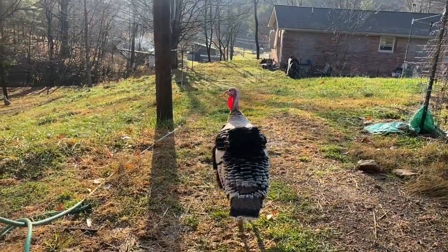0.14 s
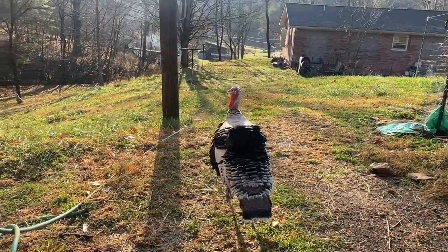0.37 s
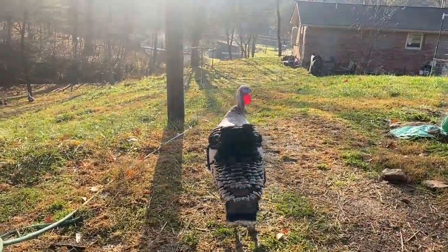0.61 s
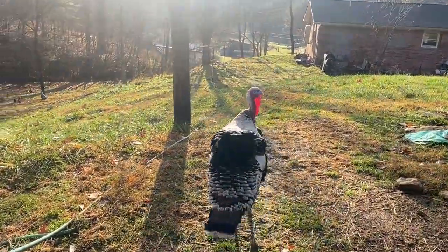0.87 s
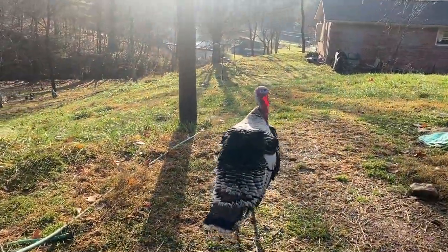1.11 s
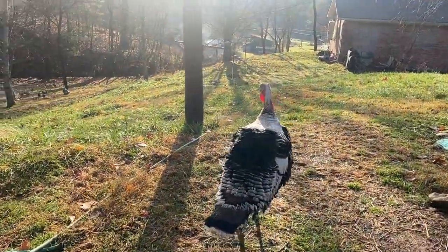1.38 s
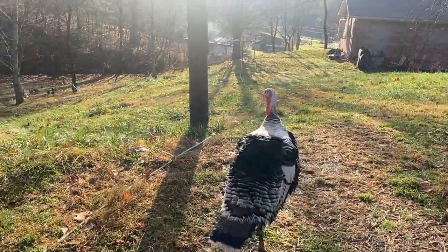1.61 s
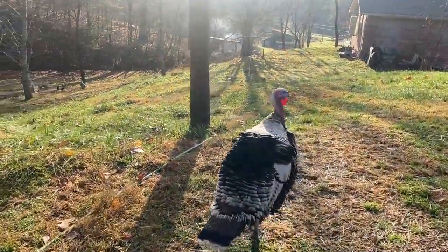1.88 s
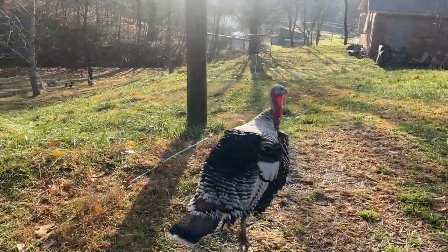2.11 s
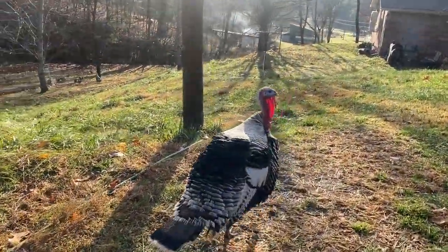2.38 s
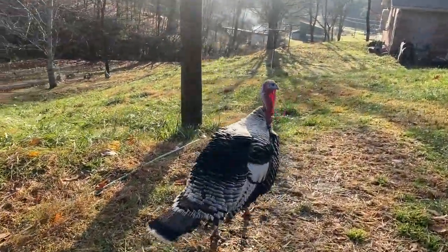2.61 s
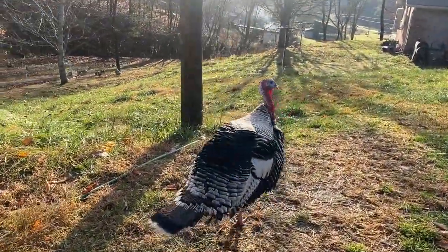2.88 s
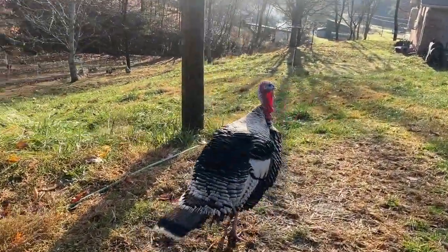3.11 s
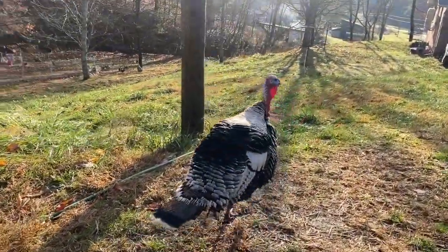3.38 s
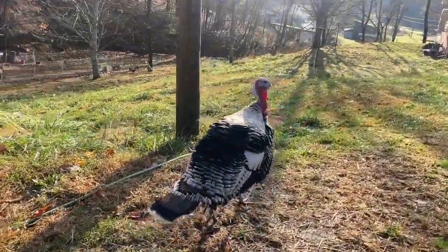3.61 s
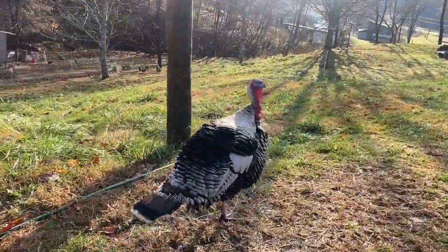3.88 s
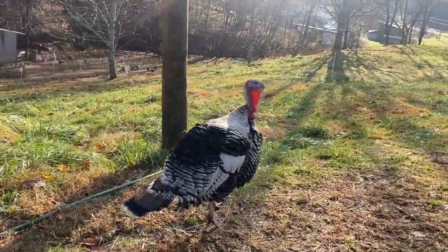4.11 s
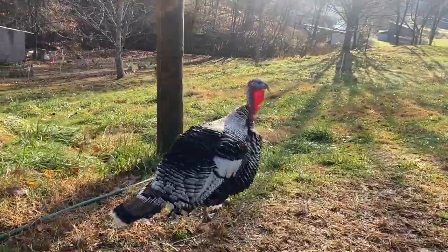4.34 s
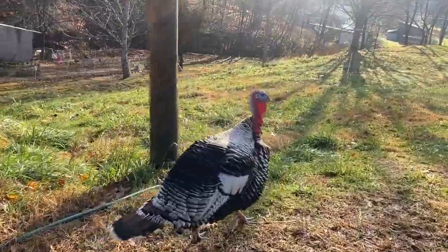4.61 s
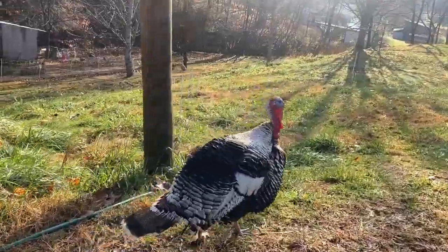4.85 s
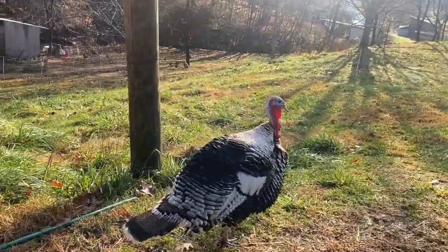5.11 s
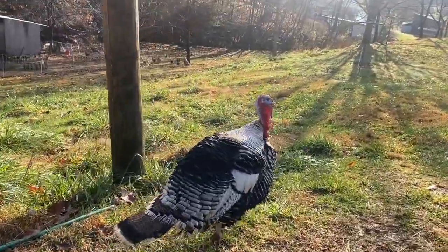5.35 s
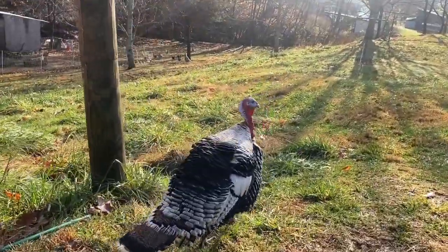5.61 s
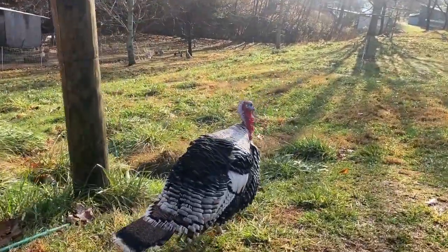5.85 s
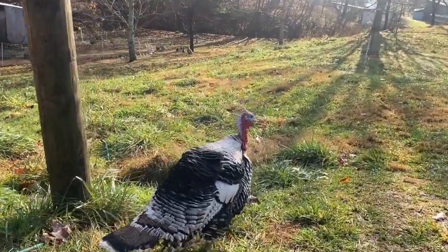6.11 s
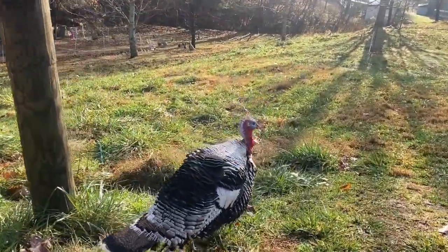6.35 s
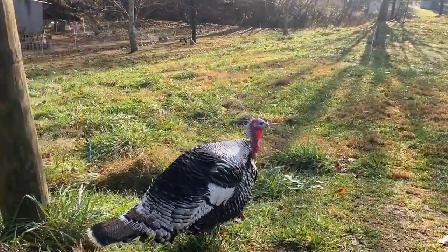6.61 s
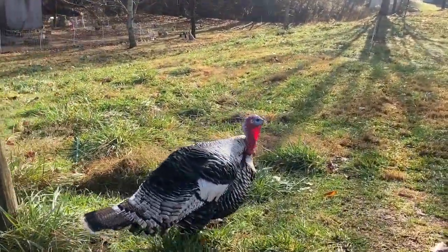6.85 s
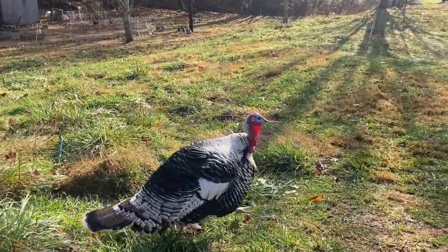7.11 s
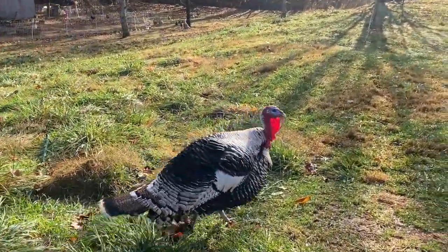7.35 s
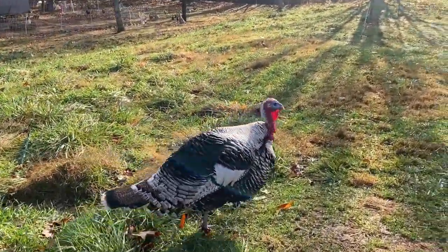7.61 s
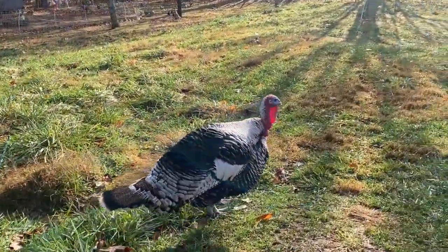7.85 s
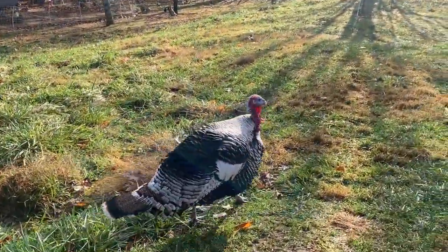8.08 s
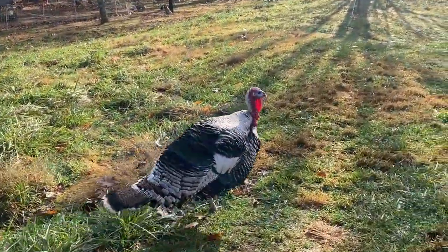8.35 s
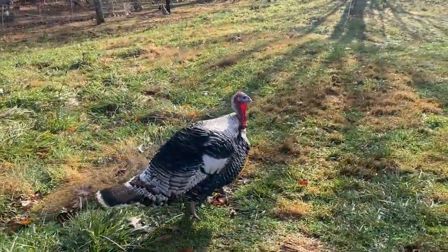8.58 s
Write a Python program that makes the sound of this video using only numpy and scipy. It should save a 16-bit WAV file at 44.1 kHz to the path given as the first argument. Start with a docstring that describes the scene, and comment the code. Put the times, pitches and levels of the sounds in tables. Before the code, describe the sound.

A tom turkey a few metres away gobbles in repeated rattling bursts, with soft chest thuds, faint outdoor echo and feet swishing through dry grass.

```python
"""A tom turkey a few metres away gobbles in bursts on a grassy yard: clear gliding notes, built from
harmonics, end in a noisy pop; a low chest boom, a struck and shaken resonance, lies under them.
Ground and nearby walls scatter the call and far slopes return a long faint echo, both as fading noise.
Feet swish through dry grass (hiss and crackle), twigs tick (tiny noise bursts), an insect trills
faintly (a wavering whistle), and a soft, mostly low background noise stays underneath."""
import sys
import numpy as np
from scipy import signal
from scipy.fft import rfft, irfft
from scipy.io import wavfile
from scipy.ndimage import uniform_filter1d

SR = 44100
rng = np.random.default_rng(int(sys.argv[2]) if len(sys.argv) > 2 else 0)


def transcribe(signal):
    """Save signal, clipped to [-1, 1], as a 16-bit WAV file at the path in sys.argv[1]."""
    frames = np.atleast_2d(signal).T
    limited = np.clip(frames, -1, 1)
    pcm = np.round(limited * 32767).astype(np.int16)
    wavfile.write(sys.argv[1], SR, pcm)


def to_linear_factor(level_db):
    """Convert decibel levels (scalar or array-like) to linear amplitude factors."""
    exponent = np.asarray(level_db, float) / 20
    return 10 ** exponent


N = 384552

# colour of dry grass and twigs: [f/Hz, relative level per Hz/dB]
GRASS_COLOUR = [(88, -31.5), (150, -7.5), (1160, -5.5), (1650, -8), (6450, -9.5), (9340, -11.5),
                (11800, -4), (13500, -36), (14600, -6.5), (15800, -25)]
# long opening notes of the gobbles; most break between two registers, some stay high;
# one curve a note: [t/s, pitch f/Hz, level/dB]
OPENING_NOTES = [
    [(0.559, 1081, -44.5), (0.571, 1100, -30), (0.583, 977, -30), (0.613, 799, -38), (0.621, 970, -43),
     (0.643, 929, -30), (0.655, 1040, -28.5), (0.663, 1170, -34), (0.665, 1210, -34.5), (0.675, 998, -32),
     (0.683, 1045, -33.5)],
    [(1.272, 1030, -45.5), (1.28, 1069, -30.5), (1.288, 1032, -26.5), (1.296, 951, -26), (1.306, 692, -34),
     (1.31, 631, -30), (1.316, 657, -32), (1.324, 758, -29.5), (1.332, 754, -44), (1.34, 900, -39.5),
     (1.356, 911, -29), (1.364, 1063, -36.5), (1.368, 1110, -28.5)],
    [(2.369, 983, -36.5), (2.377, 984, -35), (2.389, 1001, -22.5), (2.399, 917, -29), (2.409, 684, -36.5),
     (2.425, 668, -29), (2.431, 726, -31), (2.467, 781, -32), (2.485, 724, -32), (2.497, 846, -37.5),
     (2.509, 810, -27), (2.517, 952, -30), (2.52, 921, -32)],
    [(3.151, 1084, -35.5), (3.163, 1067, -26), (3.177, 933, -24), (3.187, 729, -44.5), (3.193, 690, -25.5),
     (3.201, 777, -29), (3.211, 785, -39.5), (3.217, 880, -38), (3.227, 990, -32), (3.233, 976, -21),
     (3.247, 927, -32), (3.255, 1064, -23), (3.26, 1027, -38.5)],
    [(3.954, 1090, -42.5), (3.962, 1097, -32.5), (3.974, 938, -30.5), (3.984, 941, -34.5),
     (3.992, 876, -32.5), (4.014, 948, -53.5), (4.026, 946, -29), (4.05, 959, -30.5), (4.074, 864, -33),
     (4.106, 945, -32.5), (4.114, 940, -27), (4.125, 940, -30)],
    [(4.754, 1110, -45), (4.764, 1091, -30.5), (4.774, 1008, -22.5), (4.778, 950, -27), (4.786, 750, -39),
     (4.79, 660, -28), (4.8, 675, -29), (4.822, 772, -30), (4.83, 954, -39.5), (4.836, 1008, -24.5),
     (4.864, 1002, -28), (4.876, 920, -32), (4.888, 1002, -40)],
    [(5.959, 1070, -43), (5.971, 1060, -28.5), (5.977, 976, -29), (5.993, 618, -33.5), (6.001, 611, -57),
     (6.011, 648.5, -27), (6.037, 737, -29.5), (6.049, 636, -30), (6.077, 673, -28), (6.083, 710, -31.5),
     (6.095, 1023, -31.5), (6.113, 920, -33.5), (6.118, 1000, -34)],
    [(6.766, 1064, -45), (6.776, 1110, -40), (6.782, 1040, -25.5), (6.788, 961, -27), (6.8, 618, -27.5),
     (6.808, 640, -26), (6.818, 744, -26.5), (6.828, 798, -43), (6.834, 932, -26.5), (6.842, 1048, -28),
     (6.854, 1025, -20), (6.862, 910, -27.5), (6.87, 1020, -35.5)],
    [(7.472, 1048, -43), (7.488, 1075, -27.5), (7.502, 928.5, -20.5), (7.512, 679, -27.5),
     (7.516, 654, -28), (7.526, 693, -27.5), (7.532, 773, -26.5), (7.54, 926, -32.5), (7.544, 987, -27),
     (7.562, 878, -22.5), (7.578, 1200, -50.5), (7.592, 970, -26), (7.597, 1060, -32.5)],
    [(8.251, 1150, -52), (8.261, 1300, -29), (8.267, 1282, -34), (8.275, 1013, -29), (8.283, 961, -32),
     (8.293, 967, -35.5), (8.339, 998, -29.5), (8.349, 997, -34), (8.355, 1190, -38.5), (8.379, 1188, -36)],
]
# the shorter notes that follow: most sag, then break upward; a few rise first or break downward:
# [break t/s, length before/s, length after/s, f before/Hz, f after/Hz, level before/dB, level after/dB]
SWOOP_NOTES = [ (.009, 0.011, .03, 510, 987, -33, -23.5), (.099, 0.015, 0.01, 710, 1150, -38, -28),
               (0.155, .017, .009, 738, 997, -40, -27), (.75, .028, 0.024, 625, 863, -31, -28),
               (0.831, .02, .007, 737, 1014, -29.5, -28), (0.882, 0.018, 0.007, 818, 1070, -34.5, -27),
               (1.435, .025, 0.032, 702.6, 965, -30.5, -27.5), (1.516, .016, 0.0091, 727, 944, -33, -24),
               (1.571, .014, .01, 889, 1032, -31, -27.5), (2.598, .033, 0.015, 531, 692, -24, -24.5),
               (2.665, .018, 0.0077, 721, 993, -28.5, -20), (2.724, .015, 0.0066, 754, 1200, -28, -29.5),
               (3.328, 0.029, 0.019, 557.4, 826, -28, -22), (3.406, 0.014, 0.012, 742, 1035, -25, -22.5),
               (3.464, 0.01, .01, 771, 1054, -24.5, -22), (4.187, 0.021, 0.0088, 655, 943, -26, -20),
               (4.26, 0.025, 0.012, 687, 1023, -27, -21), (4.316, .011, 0.0055, 870, 940, -35.5, -23.5),
               (4.951, 0.018, 0.026, 716, 807, -26.5, -22), (5.036, 0.021, 0.0068, 684.5, 1030, -24, -22),
               (5.093, 0.015, 0.0084, 740, 1150, -28, -25), (6.188, 0.024, 0.019, 636, 773, -24.5, -22),
               (6.27, .024, 0.0034, 751, 1030, -21.5, -25.5), (6.326, 0.019, 0.0054, 755, 1194, -38, -31.5),
               (6.382, 0.011, 0.005, 1025, 1396, -36.5, -39), (6.951, .041, .006, 731.4, 838, -21, -30.5),
               (7.008, 0.017, 0.0087, 740, 917, -24.5, -18.5), (7.066, .014, .01, 776, 1002, -21, -24),
               (7.12, .007, 0.011, 1007, 1002, -36, -36), (7.674, 0.034, 0.0093, 867.4, 736, -19, -26),
               (7.742, 0.016, 0.0077, 693, 1060, -22.5, -20), (7.8, .017, 0.0069, 753, 1260, -23, -18.5),
               (8.441, 0.026, 0.02, 826.6, 1139, -18.5, -26), (8.523, 0.015, 0.0065, 830, 1240, -21.5, -29),
               (8.583, .014, 0.0068, 841, 1327, -28, -27), ]


def rms_one(x):
    """Scale a sound to an average strength (rms) of 1."""
    return x / np.sqrt(np.mean(x ** 2) + 1e-20)


def in_time(rows):
    """Join the points of a time table by straight lines, one curve for each column after the time."""
    s, *columns = np.transpose(rows)
    return [np.interp(np.arange(N) / SR, s, c) for c in columns]


def at_hz(points, hz):
    """Read a frequency table at any frequency, along a logarithmic frequency scale."""
    table_hz, values = np.array(points)[:, :2].T
    return np.interp(np.log(np.maximum(hz, 1)), np.log(table_hz), values)


def drift(rate_hz):
    """Slow chance: noise twice through a one-pole low-pass; spread 1."""
    r = np.exp(-2 * np.pi * rate_hz / SR)
    slow = signal.lfilter([1], [1, -2 * r, r * r], rng.standard_normal(N + SR))
    return rms_one(slow[SR:])  # leave out the filter's start


def coloured(x, spectrum):
    """Make each frequency louder or softer by a spectrum in dB."""
    return irfft(rfft(x) * to_linear_factor(at_hz(spectrum, np.fft.rfftfreq(N, 1 / SR))), N)


def stereo_noise(alike):
    """Two channels sharing part of their noise; alike runs from 0 (nothing) to 1 (all)."""
    mid, side = rng.standard_normal((2, N))
    return np.sqrt(1 + alike) * mid + np.sqrt(1 - alike) * side * [[1], [-1]]


def strikes(rows):
    """One single-sample impulse for each (time in s, strength in dB)."""
    out = np.zeros(N)
    for s, db in rows:
        out[min(round(s * SR), N - 1)] = to_linear_factor(db)
    return out


def at_ports(x):
    """Direct sound reaches the microphone's two ports with a different phase and level."""
    # phase between the ports: [f/Hz, lead of left/radians]
    lead = [(100, .3), (500, .7), (2500, .75), (4500, 1.1), (8500, 1.3), (12000, 2.0), (16000, 1.2)]
    # level between the ports: [f/Hz, left over right/dB]
    tilt = [(60, -1), (240, -3), (950, 1), (3770, -2), (15000, 0.5)]
    # the microphone turns: [t/s, left over right/dB]
    turn = [(0, 1), (.7, 1.2), (1.4, 1.3), (2.5, -0.5), (4.9, 0), (6.1, 0.5), (8.4, -0.5)]
    hz = np.fft.rfftfreq(N, 1 / SR)
    # each port takes half of the difference, in opposite directions
    half = to_linear_factor(at_hz(tilt, hz) / 2) * np.exp(.5j * at_hz(lead, hz))
    turn_db, = in_time(turn)
    turn_gain = to_linear_factor(turn_db / 2)
    left = irfft(rfft(x) * half, N) * turn_gain
    right = irfft(rfft(x) / half, N) / turn_gain
    return np.array([left, right])


def background_air(level_db=-67, drift_db=1.7):
    """Partly shared stereo noise, strongest in the bass, whose level drifts slowly."""
    # colour of the background: [f/Hz, relative level per Hz/dB]
    air_colour = [(18, -26), (30, -7.5), (81, -13), (127, -17.5), (244, -22.5), (447, -23.5), (860, -23),
                  (1010, -29.5), (1570, -33.5), (6000, -44), (15800, -53)]
    noise = rms_one(coloured(stereo_noise(0.25), air_colour))
    return to_linear_factor(level_db + drift_db * drift(1)) * noise


def grass(grains_per_s=500, spread_db=5.0, grain_db=-4, level_db=3.5, loose_db=-8):
    """Blades brush as hiss while dry stalks crackle; each step swells and fades."""
    # steps through grass: [t/s, level before the common gain/dB, half length/s]
    steps = [(0.013, -69, 0.038), (0.489, -70, 0.036), (1.279, -77, 0.045), (1.993, -65.5, 0.037),
             (2.605, -64.5, 0.0085), (2.693, -69.5, 0.055), (3.326, -73.5, 0.075), (3.601, -63, 0.023),
             (4.261, -62.5, 0.0078), (4.426, -70.5, 0.047), (4.885, -70, 0.036), (5.196, -69, 0.033),
             (5.803, -69.5, 0.043), (6.01, -70.5, 0.055), (6.287, -62, 0.074), (6.493, -65.5, 0.032),
             (6.741, -64, 0.042), (6.922, -62, 0.064), (7.331, -55.5, 0.038), (7.67, -67.5, 0.067),
             (7.81, -70.5, 0.032), (8.185, -61, 0.045), (8.464, -63, 0.038)]
    # 16 faint stirrings at random moments, in the same three columns
    stirs = [(when * N / SR, -77 + 2.0 * (4 * size - 2), .022 * (.5 + long))
             for when, size, long in rng.random((16, 3))]
    t = np.arange(0, N, 32) / SR
    power = 0
    for s, db, half_s in steps + stirs:
        distance = np.minimum(abs(t - s) / max(half_s, .005), 30)
        power = power + to_linear_factor(2 * db) / np.cosh(distance) ** 2
    level = np.interp(np.arange(N) / SR, t, np.sqrt(power)) * to_linear_factor(level_db + 3.4 * drift(25))
    sizes = to_linear_factor(spread_db * np.minimum(rng.exponential(1, N), 5))
    hits = sizes * (rng.random(N) < grains_per_s / SR)
    grains = rms_one(signal.lfilter([1], [1, -.9], hits))
    near = at_ports(rng.standard_normal(N) * (1 + to_linear_factor(grain_db) * grains))
    loose = to_linear_factor(loose_db) * stereo_noise(0)
    return level * rms_one(coloured(near + loose, GRASS_COLOUR))


def opening(note, leap_ratio=1.17, leap_s=.005):
    """Any break of register (a wide pitch step) holds one pitch and leaps quickly where the note is weakest."""
    out = [note[0]]
    for (s0, hz0, db0), (s1, hz1, db1) in zip(note, note[1:]):
        if max(hz0 / hz1, hz1 / hz0) > leap_ratio and s1 - s0 > leap_s:
            s, hz = (s1 - leap_s, hz0) if db1 < db0 else (s0 + leap_s, hz1)
            out.append((s, hz, np.interp(s, [s0, s1], [db0, db1])))
        out.append((s1, hz1, db1))
    return out


def swoop(at, before_s, after_s, old_hz, new_hz, old_db, new_db):
    """Pitch and level of a shorter note: it glides to one pitch, breaks to another and is shut off."""
    break_s, shut_s = .004, .004  # time of the break; time in which the beak shuts
    start, arrive = at - before_s, at + break_s
    end = at + max(after_s, break_s + shut_s)
    first_hz = min(1.25 * old_hz, 987)
    points = [(start, first_hz, -40),
              (start + min(.006, before_s / 2), np.sqrt(first_hz * old_hz), old_db - 4),
              (start + .7 * before_s, old_hz, old_db),
              (at, old_hz, old_db - 1.5),  # a little softer just before the break
              (arrive, new_hz, new_db)]
    if end - 2 * shut_s > arrive:
        # a held pitch fades a little, then ends in a brief louder, higher flick
        points += [(end - 2 * shut_s, new_hz, new_db - 4), (end - shut_s, new_hz * 1.1, new_db - 3)]
    return points + [(end, new_hz * 1.146, new_db - 10)]


def voice(jitter=0.015, rolloff_db=-7.5, open_hz=900, open_db=4.5, effort=0.16, fickle_db=3.5,
          rasp_db=-28, short_db=4.5, short_jitter=0.028, pop_db=-16, pop_s=0.0089, glide_db=0.1,
          rasp_gain_db=17.5, shimmer_db=.7, rattle_db=1.0):
    """The syrinx sings a near sine with fickle harmonics through the throat; the beak shuts notes with a pop."""
    # throat and beak colour on the harmonics: [f/Hz, relative level/dB]
    throat = [(450, -23.5), (700, 6), (1000, 0), (1400, 10), (1540, 0), (1680, -8.5), (1800, -8.5),
              (2050, -9), (2550, -17.5), (3050, -15.5), (3800, -10.5), (4400, -27), (5200, -31)]
    out, pops = np.zeros(N), np.zeros(N)
    wobble, flutter = drift(100), drift(110)
    breath = rms_one(coloured(rng.standard_normal(N), throat))
    fickle = np.array([drift(35) for _ in range(8)])
    k = np.arange(1, 9)[:, None]  # harmonic numbers
    upper = k > 2
    octaves = np.log2(k)  # height of each harmonic above the pitch
    for note in [opening(rows) for rows in OPENING_NOTES] + [swoop(*row) for row in SWOOP_NOTES]:
        # a note creeps in faintly; the closing beak flicks the pitch up as it dies
        first, last = note[0], note[-1]
        before = (first[0] - .003, first[1], first[2] - 8)
        after = (last[0] + .006, last[1] * 1.3, last[2] - 10)
        s, hz, db = np.transpose([before, *note, after])
        short = s[-1] - s[0] < .08  # short notes are duller, rattle and grow raspy
        i = np.arange(max(round(s[0] * SR), 0), min(round(s[-1] * SR), N))
        t = i / SR
        glide_hz = np.interp(t, s, hz)
        pitch = uniform_filter1d(glide_hz, size=80) * (1 + (jitter + short * short_jitter) * wobble[i])
        # pressure builds evenly, so height rather than dB is joined between points
        height = uniform_filter1d(np.interp(t, s, to_linear_factor(db)), size=50)
        # high pitch opens the beak and effort sharpens the cycle: both lift the upper harmonics
        opened = open_db * np.log2(pitch / open_hz) * upper
        slope = rolloff_db + opened + effort * (20 * np.log10(height) + 28)  # dB an octave
        chance_db = np.sqrt(octaves) * fickle_db * fickle[:, i]
        shares = to_linear_factor(at_hz(throat, k * pitch) + octaves * slope - short_db * short * upper + chance_db)
        # a fast glide dulls the overtones (glide_db is dB for each octave a second)
        gliding = uniform_filter1d(np.abs(np.gradient(np.log2(glide_hz))) * SR, size=200)
        shares *= to_linear_factor(-np.minimum(glide_db * gliding, 15) * upper)
        shares /= np.sqrt(np.sum(shares ** 2, axis=0) / 2)  # same strength whatever the colour
        tone = np.sum(shares * np.sin(k * np.cumsum(2 * np.pi * pitch / SR)), axis=0)
        progress = (t - s[0]) / (s[-1] - s[0])
        rasp = to_linear_factor(rasp_db + rasp_gain_db * short * progress) * breath[i]
        fade = np.clip(np.minimum((t - s[0]) / .005, (s[-1] - t) / .006), 0, 1)
        edges = np.sin(np.pi / 2 * fade)
        unsteady = to_linear_factor((shimmer_db + rattle_db * short) * flutter[i])
        out[i] = edges * height * unsteady * (tone + rasp)
        pops[i[-1] - round(.01 * SR)] = to_linear_factor(db[-3])
    puff = signal.lfilter([1], [1, -np.exp(-1 / (pop_s * SR))], uniform_filter1d(pops, size=44) + 1e-18)
    soften = signal.butter(4, 5200, fs=SR, output="sos")
    return signal.sosfilt(soften, out + to_linear_factor(pop_db) * puff * breath)


def jolts(lag_s=.022, after_db=-51.5):
    """Every note jolts the air sac a moment after it starts, more weakly under the shorter notes."""
    # jolt under each opening note: [strength before the boom's filter and gain/dB]
    jolt_strengths = [-38.5, -34.5, -41, -39, -38.5, -34.5, -34.5, -29, -31, -33]
    first = [(note[0][0] + lag_s, db) for note, db in zip(OPENING_NOTES, jolt_strengths)]
    return first + [(at - before_s + lag_s, after_db) for at, before_s, *_ in SWOOP_NOTES]


def boom(call, boom_hz=84.5, t60_s=0.1, soft_hz=130, level_db=-1.0, shake_db=-26, shake_s=0.027):
    """The inflated chest thuds softly as air is driven out and keeps shaking while the bird calls."""
    # a resonance that dies by 60 dB in t60_s
    r, w = to_linear_factor(-60 / (t60_s * SR)), 2 * np.pi * boom_hz / SR
    top, bottom = [0, np.sin(w)], [1, -2 * r * np.cos(w), r * r]
    thuds = signal.lfilter(top, bottom, strikes(jolts()) + 1e-18)
    rumble = rms_one(signal.lfilter(top, bottom, rng.standard_normal(N)))
    slow = np.exp(-1 / (shake_s * SR))
    loudness = signal.lfilter([1 - slow], [1, -slow], np.abs(call))
    chest = thuds + to_linear_factor(shake_db) * rumble * loudness
    return to_linear_factor(level_db) * signal.sosfilt(signal.butter(2, soft_hz, fs=SR, output="sos"), chest)


def yard(x, near_db=-14, near_t60_s=0.048, near_gap_s=0.0047, far_db=-31, far_t60_s=1.9, far_gap_s=0.023,
         echo_s=0.023, echo_db=-26.5):
    """Dense scatter from ground and walls dies fast around one clear echo; a faint far echo lingers."""
    # colour of the returning sound: [f/Hz, gain/dB]
    scatter_colour = [(300, -13), (800, -0.5), (1400, -0.5), (2200, 8.5), (2700, 0), (5000, -10.5)]
    t = np.arange(2 * SR) / SR
    response = 0
    near = (near_db, near_t60_s, near_gap_s, .6)
    far = (far_db, far_t60_s, far_gap_s, .3)
    for db, t60_s, gap_s, alike in (near, far):
        tail = stereo_noise(alike)[:, :2 * SR] * to_linear_factor(-60 * t / t60_s) * (t > gap_s)
        response = response + to_linear_factor(db) * tail / np.sqrt(np.mean(np.sum(tail ** 2, axis=1)))
    response[:, round(echo_s * SR)] += to_linear_factor(echo_db)  # something a few metres off
    return signal.fftconvolve(coloured(x, scatter_colour)[None], response, axes=1)[:, :N]


def insect(waver=0.01, throb_db=6.0):
    """A thin whistle whose pitch wavers and whose level throbs by chance."""
    # the trill before waver and throb: [t/s, f/Hz, level/dB]
    trill = [(1.36, 4950, -99), (1.42, 4800, -80.5), (1.7, 4880, -101.5), (1.82, 4600, -82),
             (2.05, 4550, -95), (2.13, 4900, -78), (2.5, 4980, -87), (2.8, 4930, -77.5),
             (3.12, 4880, -99.5)]
    hz, db = in_time(trill)
    wavering_hz = hz * (1 + waver * drift(270))
    return to_linear_factor(db + throb_db * drift(30)) * np.sin(np.cumsum(2 * np.pi * wavering_hz / SR))


def twigs(snap_s=0.0018, level_db=3.5, body_hz=3000):
    """Each tick is a burst of noise about two milliseconds long, coloured like the grass but fuller."""
    # twigs: [t/s, strength before filters and gain/dB]
    ticks = [(2.723, -62), (4.358, -56.5), (4.371, -44), (4.4239, -37), (4.4846, -48), (5.1697, -54.5),
             (5.2297, -54.5), (6.117, -56), (7.3118, -59), (7.3272, -44.5), (8.0336, -63.5), (8.4847, -61),
             (8.4946, -53.5)]
    decay = signal.lfilter([1], [1, -np.exp(-1 / (snap_s * SR))], strikes(ticks) + 1e-18)
    burst = decay * rng.standard_normal(N)
    body = signal.sosfilt(signal.butter(1, body_hz, fs=SR, output="sos"), burst)
    return to_linear_factor(level_db) * at_ports(coloured(burst + 2.7 * body, GRASS_COLOUR))


def scene():
    """Add the bird, its echoes and the quiet sounds of the yard."""
    call = voice()
    bird = at_ports(call + boom(call))
    return bird + yard(call) + grass() + twigs() + insect() + background_air()


def band_limit(x):
    """A steep low-pass at the top of the band."""
    return signal.sosfilt(signal.butter(12, 16790, fs=SR, output="sos"), x)


def record(dry):
    """The microphone drops the deepest bass and the top."""
    bass_cut = signal.butter(4, 48, "high", fs=SR, output="sos")
    top_cut = signal.cheby2(16, 60, 16400, fs=SR, output="sos")
    mix = signal.sosfilt(np.vstack([bass_cut, top_cut]), dry)
    return band_limit(mix)


dry = scene()
out = record(dry)
transcribe(out)
```